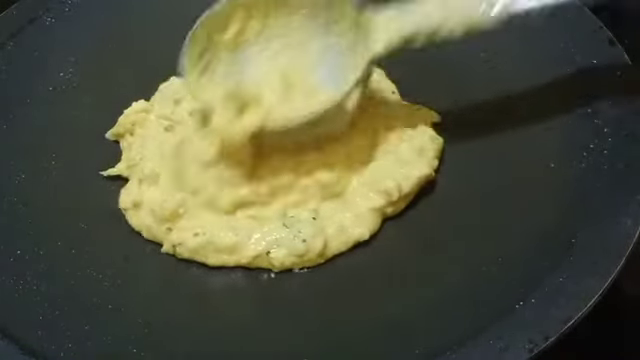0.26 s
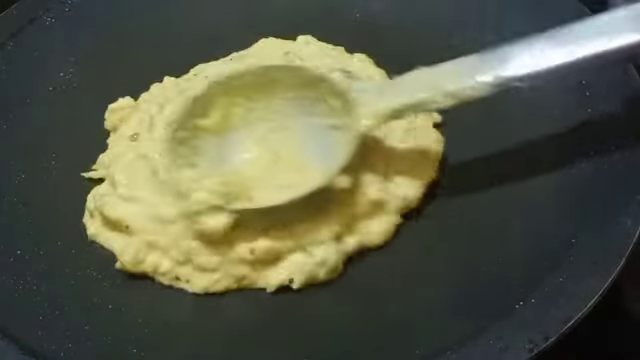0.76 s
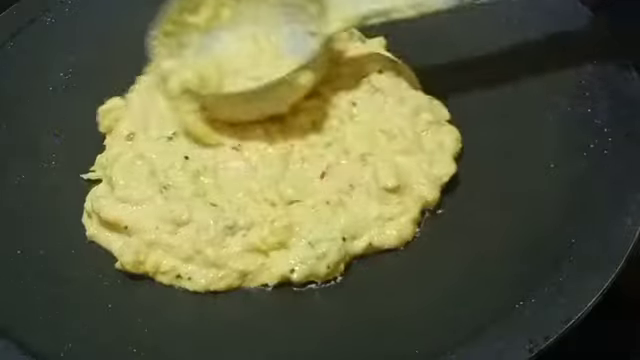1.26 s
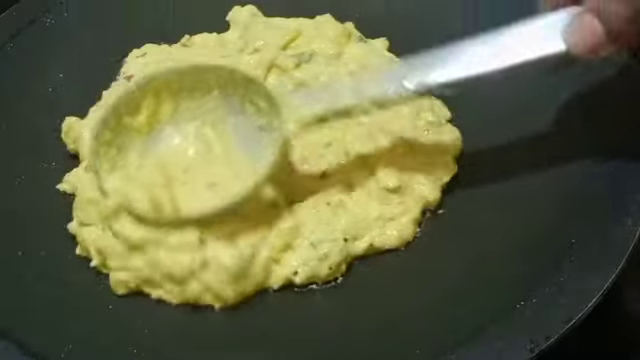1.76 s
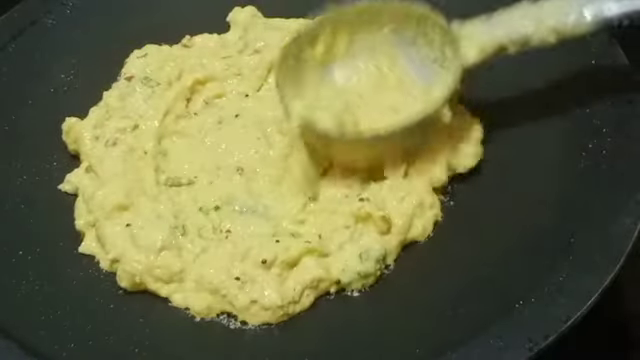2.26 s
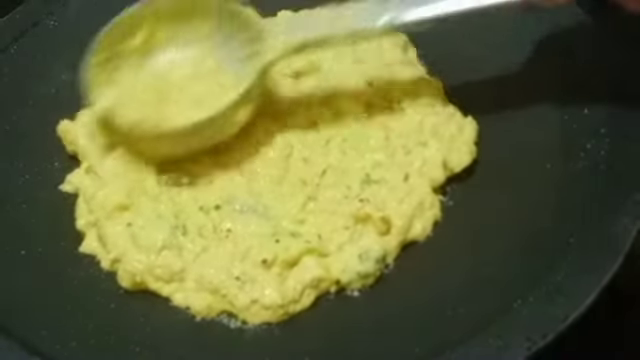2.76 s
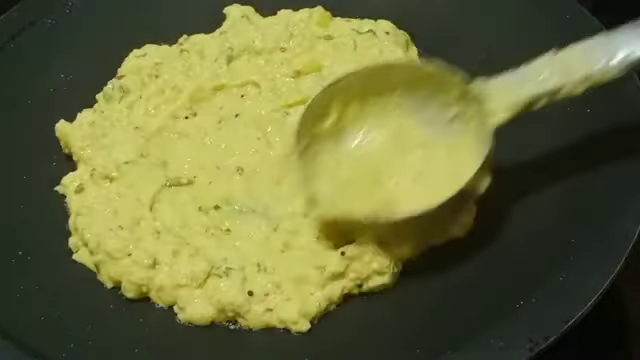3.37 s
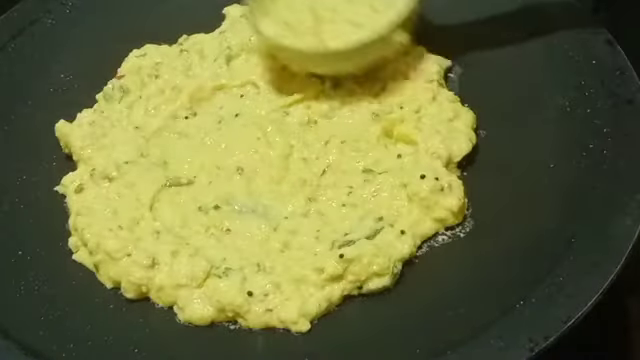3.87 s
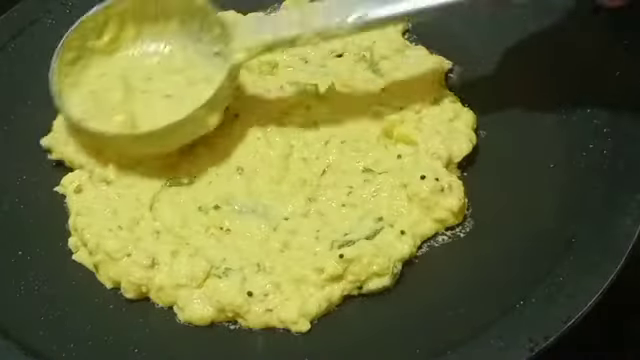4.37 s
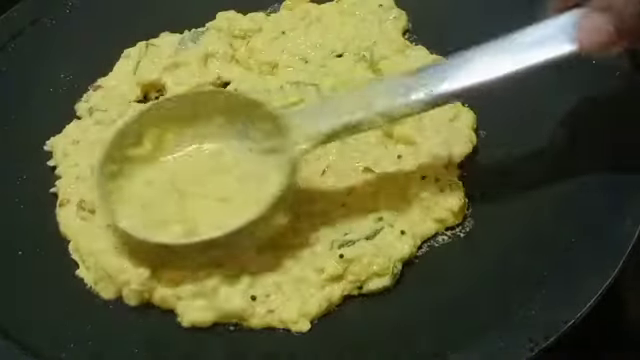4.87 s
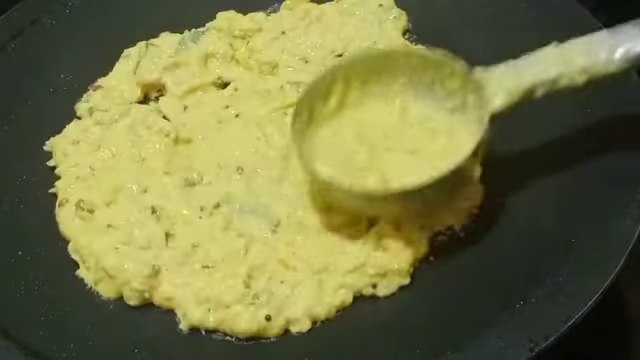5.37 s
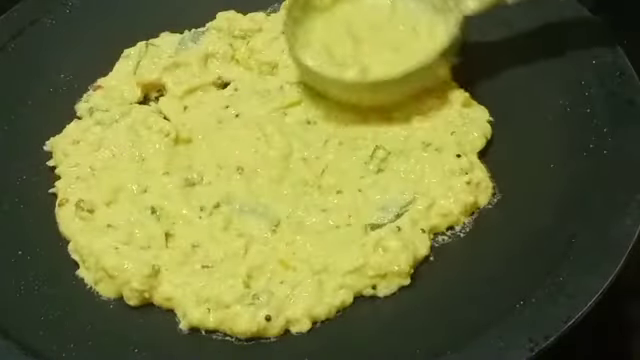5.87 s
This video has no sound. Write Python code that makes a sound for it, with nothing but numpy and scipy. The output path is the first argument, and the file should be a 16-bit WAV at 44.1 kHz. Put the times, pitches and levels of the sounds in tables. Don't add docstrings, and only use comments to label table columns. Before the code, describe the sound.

Close to a hot griddle in a kitchen, batter fries quietly with a few small spits. Soon a ladle begins circling, and each press squeezes out a burst of dense, bright, crackling steam. Sharper drops pop and bounce on the pan. A low extractor fan hums steadily throughout, and the boil eases at the end.

```python
import sys
import numpy as np
from scipy import signal
from scipy.fft import rfft, irfft, next_fast_len
from scipy.io import wavfile
from scipy.ndimage import uniform_filter1d

SR = 44100
rng = np.random.default_rng(int(sys.argv[2]) if len(sys.argv) > 2 else 0)


def wrap_up_sound(samples):
    columns = np.atleast_2d(samples).T
    tamed = np.clip(columns, -1, 1)
    steps = np.round(tamed * 32767).astype(np.int16)
    wavfile.write(sys.argv[1], SR, steps)


def gain_from_db(level_db):
    decades = np.asarray(level_db, float) / 20
    return 10 ** decades


N = 270024

# centre in Hz, width in Hz, level in dB.
PAN = [(1510, 14, 4), (1662, 4.9, -16), (2230, 59, -1.5), (2283, 17, -2), (2470, 25, -1), (2760, 33, 3.5),
       (3324, 15, 0.5), (3840, 91, -6.5), (4100, 68, -4), (4730, 25, -1), (5530, 25, -3), (15100, 700, -14)]


def unit(x):
    return x / np.sqrt(np.mean(x ** 2))


def colour(x, points):
    hz, db = np.transpose(points)
    grid_hz = np.maximum(np.fft.rfftfreq(4096, 1 / SR), 1)
    gain_db = np.interp(np.log(grid_hz), np.log(hz), db)
    cepstrum = irfft(np.log(gain_from_db(gain_db)))
    cepstrum[1:2048] *= 2
    cepstrum[2049:] = 0
    response = irfft(np.exp(rfft(cepstrum)))
    return signal.fftconvolve(x, response)[:N]


def ring(x, hz, width_hz):
    return signal.lfilter(*signal.iirpeak(hz, hz / max(width_hz, 5.), fs=SR), x)


def walk(rate):
    hold = int(SR / rate)
    steps = np.repeat(rng.standard_normal(N // 20)[:N // hold + 1], hold)
    slewed = uniform_filter1d(uniform_filter1d(steps, hold), hold)
    return unit(slewed[:N])


def split(x):
    crossovers = [2000, 6200, 11500]
    size = next_fast_len(len(x))
    octave = np.log2(np.maximum(np.fft.rfftfreq(size, 1 / SR), 1))
    above = [.5 + .5 * np.tanh(6 * (octave - np.log2(hz))) for hz in crossovers]
    shares = -np.diff([np.ones_like(octave)] + above + [0 * octave], axis=0)
    return irfft(rfft(x, size) * shares, size)[:, :len(x)]


def curves(table):
    s, *columns = np.transpose(table)
    return (np.interp(np.arange(N) / SR, s, c) for c in columns)


def fan():
    # multiple of the shaft rate, level in dB.
    shaft_lines = [(3, -21), (4, -18), (5, -10), (6, -12), (7, 2.5), (8, -9), (9, -10), (11, -23.5),
                   (12, -12.5), (13, -14), (15, -16), (16, -9.5), (18, -27.5), (19, -11.5), (20, -18.5),
                   (21, -31.5), (22, -20), (23, -12.5), (24, -28), (25, -26), (26, -18), (28, -39),
                   (30, -24.5), (32, -39)]
    # frequency in Hz, gain in dB per Hz.
    air_colour = [(15, -63), (25, -33), (98, -2), (169, -1.5), (252, -1), (385, -5), (511, -7.5),
                  (763, -8.5), (2010, -18), (2540, -9.5), (5400, -35.5), (7000, -17.5), (9100, -70),
                  (15400, -120)]
    # centre in Hz, width in Hz, rms level in dB, end in seconds.
    hood_notes = [
        (773, 11, -66.5, 2.5),
        (785, 17, -68.5, 2.5),
        (2480, 210, -61.5, 9),
    ]
    shaft_hz = 172.05 / 7
    hum_db, air_db = -52.5, -52
    t = np.arange(N) / SR

    hum = np.zeros(N)
    for k, db in shaft_lines:
        waver_db = (.6 if k == 7 else .9) * walk(12)
        phase = 1.45 * (k - 7) ** 2
        hum += gain_from_db(db + waver_db) * np.sin(2 * np.pi * k * shaft_hz * t + phase)

    rush = unit(colour(rng.standard_normal(N), air_colour)) * gain_from_db(air_db + 0.59 * walk(2.3))

    notes = np.zeros(N)
    for hz, width_hz, db, end in hood_notes:
        tone = ring(ring(rng.standard_normal(N), hz, width_hz), hz, width_hz)
        notes += gain_from_db(db) * unit(tone) / (1 + np.exp((t - end) / 0.11))
    return np.sqrt(2) * gain_from_db(hum_db) * hum + rush + notes


def body(x, damping_db):
    # frequency in Hz, gain in dB per Hz.
    burst_colour = [(470, -38.5), (800, -18), (1220, -15.5), (1470, -14.5), (1680, -13.5), (2720, -9.5),
                    (3010, -6.5), (3280, -4.5), (4470, -11), (5720, -11), (6980, -9), (8930, -0.5),
                    (10800, -5), (15400, -6)]
    # centre in Hz, width in Hz, level in dB.
    port = (8810, 1200, -5.5)
    rung = x.copy()
    for (hz, width_hz, db), damp in zip(PAN, damping_db):
        rung = rung + ring(x * gain_from_db(db + damp), hz, width_hz)
    at_port = rung + gain_from_db(port[2]) * ring(x, *port[:2])
    return colour(at_port, burst_colour)[:len(x)]


def boil():
    # time in seconds, boil in dB, open view of the rim in dB (low = shaded by the bowl).
    ladle_path = [(0, -58.5, 6), (0.54, -58.5, 7.5), (0.62, -49, 6.5), (0.72, -45, 6), (1.15, -42.5, 8),
                  (1.7, -47, 8.5), (1.92, -43.5, 7), (2.33, -43, 7.5), (2.62, -47, 9.5), (3.15, -50.5, 10),
                  (3.3, -45.5, 8), (3.72, -43, 9.5), (3.82, -45.5, 9.5), (4.5, -49.5, 8), (4.7, -45, 6),
                  (5.05, -42, 5.5), (5.3, -44.5, 6.5), (6.12, -51, 8.5)]
    # peak in seconds, dB over the boil, fade in seconds, fineness in dB.
    puffs = [(0.39, 6, 0.065, -1), (0.6, 2.5, 0.059, 2), (0.76, 3, 0.036, 2), (1.09, 2, .05, 0),
             (1.26, 3, .08, 0), (1.77, 2.5, 0.072, -3), (1.92, 0.8, 0.092, 1), (2.22, 1.3, 0.16, 1.5),
             (2.41, 3, 0.19, 2), (3.2, -1, .05, -4), (3.4, 0, 0.094, 2.5), (3.688, 3.5, 0.04, -1),
             (4.04, 1.5, 0.064, 1), (4.17, 2.5, 0.065, -1), (4.31, 2, .04, 2), (4.55, 0, 0.093, -2),
             (4.9, 0.1, 0.12, -3), (5.13, -1.5, 0.075, 2), (5.38, 4.5, 0.096, 1.5), (5.6, 2.5, 0.28, 0.5),
             (5.77, 0.5, 0.17, -0.5), (5.92, 3, .04, -6)]
    t = np.arange(N) / SR
    boil_db, open_db = curves(ladle_path)
    puff_db = fine_db = 0
    for s, db, fade, fine in puffs:
        stretch = np.where(t < s, 0.54, 1)
        shape = np.exp(-((t - s) / (max(fade, .01) * stretch)) ** 2)
        puff_db = puff_db + db * shape
        fine_db = fine_db + fine * shape
    shade_db = 8 - open_db
    effort_db = boil_db + 45

    low_db = -55.5 + 0.53 * effort_db + 0.7 * shade_db + 0.1 * puff_db
    pan_db = boil_db + 0.47 * puff_db
    fry_db = boil_db + open_db + puff_db
    top_db = fry_db - 4 + 0.1 * effort_db + 0.23 * shade_db + fine_db
    return np.array([low_db, pan_db, fry_db, top_db])


def strays(fry_db, count=140):
    # peak in dB, top air in dB, thud in dB.
    spread_db = (4, 2.5, 5)
    s, *chance = rng.random((count, 4)).T
    s = .01 + s * (N / SR - .02)
    peak_db = -19 + .6 * (fry_db[(s * SR).astype(int)] + 38)
    air_db, thud_db = 0 * s, 0 * s - 5
    means = np.transpose([peak_db, air_db, thud_db])
    return np.column_stack([s, means + (2 * np.transpose(chance) - 1) * spread_db])


def spits(fry_db):
    # time in seconds, peak in dB, top air in dB re peak, pan thud in dB re peak.
    drops = [(0.0152, -20, -8, -6), (0.1013, -21, -4, -7), (0.131, -20, -3, -8), (0.1812, -18, 2, -2),
             (0.2345, -22, -1, -2), (0.3648, -21, -1, -9), (0.3826, -23, -3, -8), (0.497, -19.5, -4, -12),
             (0.576, -15, -3, -2), (0.5924, -13.5, 3, -3), (0.6076, -10, -5, -16), (1.0846, -8, -1, -2),
             (1.2843, -10, -1, -8), (2.2847, -9, -1, -5), (2.8798, -18, -1, -10), (3.124, -16, 0, -2),
             (3.7738, -12, 2, -13), (3.9632, -19, 4, -5), (4.043, -11, -2, -12), (4.1436, -19, -3, -10),
             (4.2957, -8, 1, -1), (4.5248, -10.5, -5, -12), (4.6841, -11, 1, -7), (4.6931, -10.5, -2, -3),
             (5.0962, -19, 6, -12), (5.2383, -11, -1, -11), (5.361, -10, 0, -5), (5.9326, -13, -3, -12),
             (6.0439, -12, .5, -10), (6.0636, -14, -2, -3)]
    # delay in ms, level in dB.
    bounces = [
        (1.5, -6),
        (3.1, -33),
    ]
    # centre in Hz, width in Hz, level in dB.
    drop_ring = (8900, 1100, -1)
    s, peak_db, top_db, thud_db = np.vstack([drops, strays(fry_db)]).T
    lead = 256
    click = np.zeros(4096)
    click[lead] = 1
    for ms, db in bounces:
        click[lead + int(ms * SR / 1000)] = gain_from_db(db)
    click = click + gain_from_db(drop_ring[2]) * ring(click, *drop_ring[:2])
    click = body(click, np.zeros(len(PAN)))

    kicks = np.zeros((4, N))
    gains_db = np.array([thud_db + 4, thud_db - 1.5, 0 * s - 3.5, top_db - 2.5])
    kicks[:, (s * SR).astype(int) - 2] = gain_from_db(peak_db + gains_db) / np.abs(click).max()
    return signal.fftconvolve(kicks, split(click), axes=1).sum(axis=0)[lead:lead + N]


def bursts(rate, spread_db):
    pick, size, sign = rng.random((N, 3)).T
    heights = gain_from_db(-spread_db * np.log(1 - .998 * size))
    clicks = (pick < rate / SR) * heights * np.where(sign < .9, 1, -1)
    return unit(clicks / np.sqrt(rate))


def sizzle(levels_db):
    fry_db = levels_db[2]
    rate = 2800 * gain_from_db(.5 * (fry_db + 38) + 2.5 * walk(40))
    rate = np.clip(rate, 50, 20000)
    damping_db = [2.4 * walk(2.87) for _ in PAN]
    crackle = split(body(bursts(rate, spread_db=2.5), damping_db))
    fizz = split(body(rng.standard_normal(N) * gain_from_db(0.6 * walk(60)), damping_db))
    fizz_db = [5.0, 5.0, 0.0, -2]
    mix = np.zeros(N)
    for clicks, hiss, hiss_db, db in zip(crackle, fizz, fizz_db, levels_db):
        mix += unit(clicks + gain_from_db(hiss_db) * hiss) * gain_from_db(db + 0.23 * walk(15))
    return mix


def scene():
    levels_db = boil()
    pan = sizzle(levels_db) + spits(levels_db[2])
    turned = signal.hilbert(pan, next_fast_len(N))[:N] * np.exp(1j * 1.2)
    fade_in = np.minimum(np.arange(N) / SR / 0.0024, 1)
    mono = turned.real + fan() * fade_in
    return np.array([mono, mono])


def band_limit(x):
    return signal.sosfilt(signal.butter(12, 16690, fs=SR, output="sos"), x)


def record(dry):
    top_hz = 15510
    size = next_fast_len(N)
    hz = np.fft.rfftfreq(size, 1 / SR)
    slope = 1 / (1 + np.exp((hz - top_hz) / 22))
    shelf = gain_from_db(-41) * (hz < top_hz + 350)
    mix = irfft(rfft(dry, size) * np.maximum(slope, shelf), size)[:, :N]
    return band_limit(mix)


dry = scene()
out = record(dry)
wrap_up_sound(out)
```